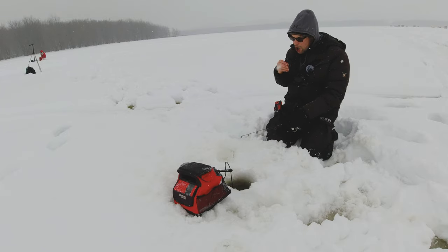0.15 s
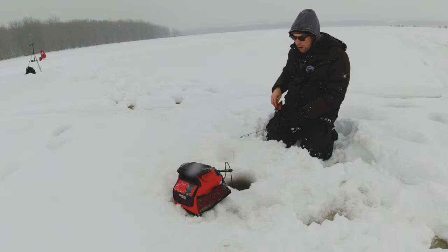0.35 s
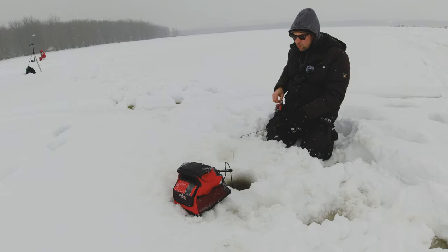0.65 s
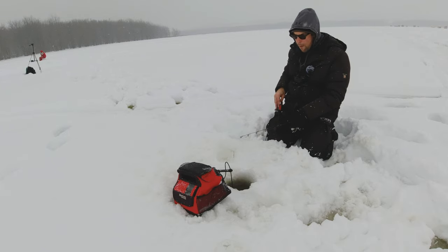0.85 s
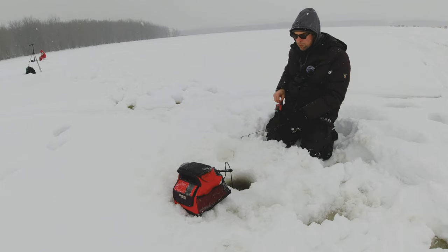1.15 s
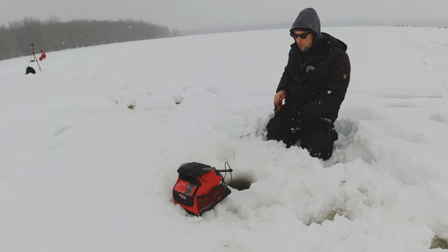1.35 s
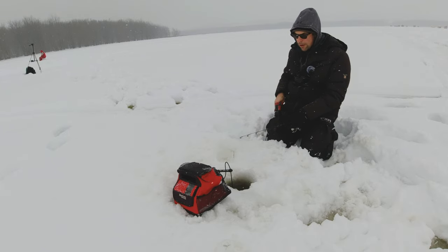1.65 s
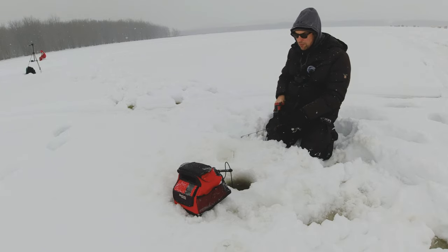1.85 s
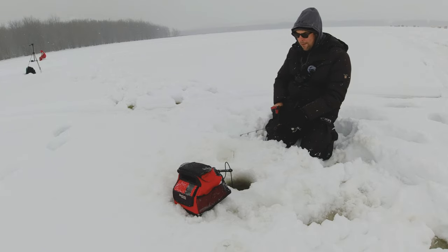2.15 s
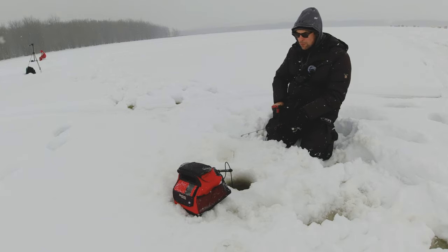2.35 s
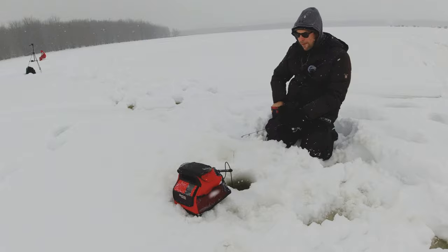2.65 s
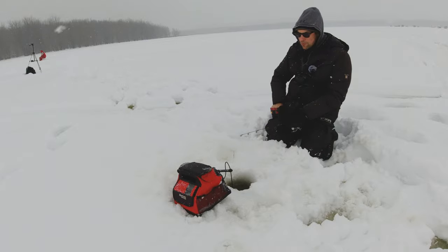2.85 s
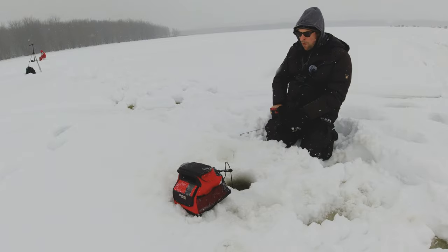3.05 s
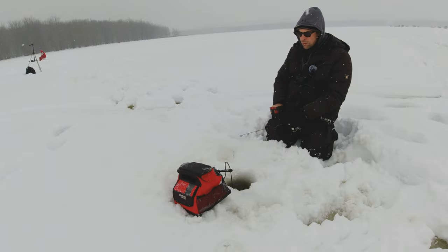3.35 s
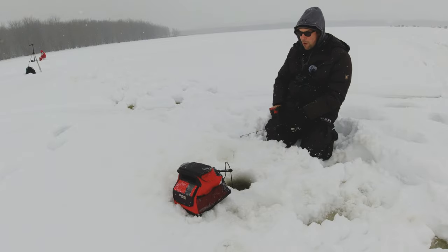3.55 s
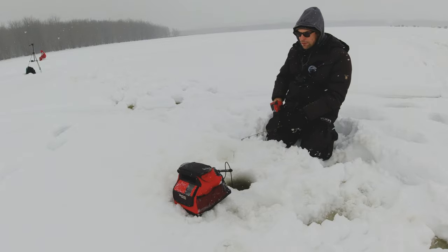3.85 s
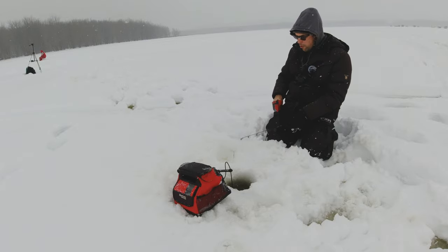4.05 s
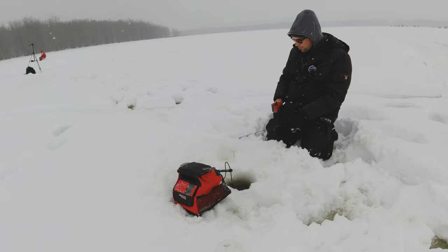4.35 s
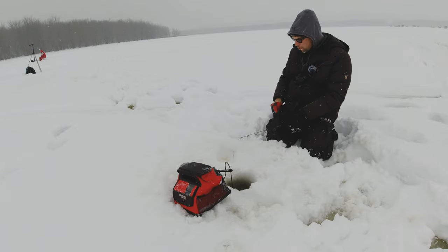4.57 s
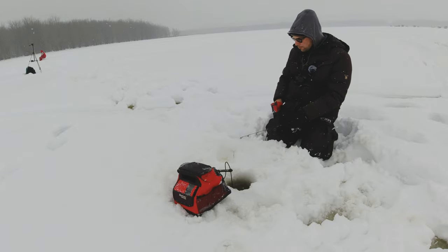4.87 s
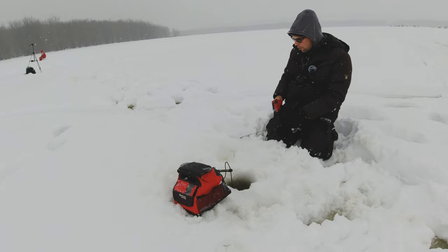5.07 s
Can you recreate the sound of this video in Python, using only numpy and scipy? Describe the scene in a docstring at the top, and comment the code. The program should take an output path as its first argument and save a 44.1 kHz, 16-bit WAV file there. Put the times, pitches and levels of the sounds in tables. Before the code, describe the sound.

A stiff, cold plastic wrapper is handled right against the microphone on an open frozen lake. After a brief quiet start with wind rumble and hiss, sharp creases snap in irregular clumps, mixed with fine crackle and dull low thumps. Activity is densest around two seconds, thins near three, then picks up again to the end. Dry, close, nearly mono, no echo.

```python
"""A stiff, cold plastic wrapper crumpled close to one microphone on a frozen lake, for about five seconds.
Wind rumble and each channel's hiss, both shaped noise, run throughout; a faint wavering sine whistles first.
From 0.37 s creases snap one by one, each a short ring, a bright tick and a soft push, over dull thumps
and fine crackle that follows the hand. The whistle returns near 1 s, a gust lifts the rumble around 1.4 s,
a third whistle comes near 3.6 s, and the creases go on to the end."""
import sys
import numpy as np
from scipy import signal
from scipy.io import wavfile
from scipy.ndimage import uniform_filter1d

SR = 44100
rng = np.random.default_rng(int(sys.argv[2]) if len(sys.argv) > 2 else 0)


def store_wav(level_fs):
    """Save 16-bit WAV to argv[1]."""
    pcm = np.round(np.clip(np.atleast_2d(level_fs), -1, 1) * 32767)
    wavfile.write(sys.argv[1], SR, pcm.T.astype(np.int16))


N = 229960  # samples

# Each crease that buckles close to the microphone:
# (time [s], loudest body level [dB], ring pitch [Hz], bright tick against the body [dB], time scale [ms])
CREASES = [(0.3735, -17.5, 3480, -11, 1.6), (0.3822, -23, 2400, -13, 12), (0.4015, -17.5, 1160, -10, 4.7),
           (0.4256, -25, 3300, -3, 1.5), (0.4297, -24, 2700, -18, 4.3), (0.529, -27, 2620, -17, 1.2),
           (0.5422, -23, 1680, -35, 1.6), (0.5684, -26, 1500, -30, 3.9), (0.577, -24, 1290, -52, 2.1),
           (0.5953, -26.5, 2650, -14.5, 5.4), (0.7778, -27, 1800, -5, 4.5), (0.7946, -29, 1260, -27, 7.6),
           (0.8147, -22, 1410, -15, 3.3), (0.8353, -32, 990, -33, 5), (0.884, -36, 2580, -27, 1.7),
           (0.9319, -26, 1490, -19.5, 8.2), (1.0671, -28, 1600, -14.5, 6.9),
           (1.2474, -21.5, 1030, -38, 2.7), (1.2814, -19, 2950, -9, 2.7), (1.3011, -19, 1620, -13, 9.3),
           (1.31, -18.5, 2110, -6, 4.7), (1.343, -26.5, 2380, -12, 7.5), (1.3548, -17.5, 1800, -15, 0.27),
           (1.3855, -18, 1520, -5, 6.5), (1.4266, -20, 1110, -22, 0.4), (1.459, -41.5, 2630, 6.5, 7.3),
           (1.5122, -23, 1810, -12, 1), (1.5296, -14, 1140, -11, 3.1), (1.5376, -16.5, 1850, -12.5, 7.3),
           (1.5505, -20.5, 1530.0, -23, 0.91), (1.6257, -33.5, 1770, -17, 3.3),
           (1.658, -18, 1750, -9.5, 7.1), (1.6765, -32, 1400, -22, 2), (1.692, -21, 1760, -21, 3.6),
           (1.746, -34, 2700, -12, 1.5), (1.772, -31, 2180, -25, 3.8), (1.7915, -27, 2070, -21.0, 2.6),
           (1.8043, -24.5, 2140, -20, 5.6), (1.815, -20.5, 2880, -12, 2.5), (1.825, -21, 2980, -10, 1.2),
           (1.846, -27, 2400, -8, 3.3), (1.8624, -20, 1540, -11, 0.95), (1.897, -21, 1730, -11, 2.4),
           (1.9083, -22.5, 2470.0, -6, 2.8), (1.921, -26.5, 1900, -18, 5.5),
           (1.9713, -26.5, 1600, -18, 3.5), (1.982, -23, 1920, -10.5, 5.6), (1.998, -22, 3150, -15, 2),
           (2.0059, -26.5, 2020, 3, 3.3), (2.033, -28, 2520, -18, 8.6), (2.083, -21, 1800, -0.5, 3),
           (2.104, -18.5, 3450, -4, 2.2), (2.118, -17, 2380, -4, 2.6), (2.1385, -21, 2420, -12, 1.6),
           (2.148, -22.5, 1960, -1, 1.4), (2.1627, -28, 1500, -16, 2), (2.191, -26.5, 1970, -7.5, 5.9),
           (2.262, -7.5, 4000, -14, .9), (2.2746, -29.5, 2050, -9, 4.1), (2.3464, -28.5, 1950, -12, 2.2),
           (2.397, -18.5, 2440, -5.5, 1.1), (2.4081, -17.5, 2180, -34, 2.1), (2.4707, -26, 1700, -18, 0.83),
           (2.544, -37.5, 2810, 0, 0.84), (2.5587, -28, 3300, -20, 1.2), (2.567, -23.5, 2340, -16, 1.5),
           (2.579, -32, 1700, -23, 1.3), (2.5853, -18.5, 2450, -15.5, 3.9), (2.5996, -18, 1400, -12, 3.5),
           (2.64, -29, 2400, -9, 3), (2.702, -23, 1660, -14, 2.1), (2.7376, -23.5, 1040, -9, 1.2),
           (2.7538, -24.5, 2200, -26, 1.3), (2.7597, -20.5, 2560, -8, 3.2), (2.7675, -22.5, 2100, -25, 4.5),
           (2.7815, -30, 3330, -19, 1), (2.856, -32.5, 1780, -29, 2), (2.9327, -33.5, 1670, -31.0, 2.4),
           (2.9468, -34, 1810, -20, 9.1), (2.991, -28.5, 2140, -12, 2.3), (3.02, -32.5, 1740.0, -13, 3.9),
           (3.0368, -30.5, 1100, -15, 1.7), (3.1564, -26.5, 3120, -5, 0.81), (3.2204, -34, 1970, -7, 0.62),
           (3.2445, -29, 1820, -35.0, 0.61), (3.3598, -30, 1330, -24, 1.5),
           (3.3844, -27.5, 3470, -16.5, 2.1), (3.4699, -16, 1270, -26, 1.9), (3.506, -25, 2650, -17, 0.88),
           (3.6823, -26, 1750, -21, 1.9), (3.747, -25, 1950.0, -8.5, 1.9), (3.7586, -20, 1540, -14, 1.3),
           (3.765, -28, 1650, -13, 5.6), (3.7781, -19, 1780, -13, 1.6), (3.807, -18.5, 1800, -13.5, 7.7),
           (3.816, -17.5, 1660, -15, 4.2), (3.8327, -31, 2200, -9, 3.7), (3.8378, -26, 1500, -5, 2),
           (3.8439, -11.5, 1720, -13, 3), (3.8707, -20.5, 1520, -10.5, 3.6), (3.9046, -21, 960, -21, 8.9),
           (3.942, -32.5, 3200, -13, 1.2), (3.9589, -16.5, 1580, -17, 0.69),
           (4.0086, -19.5, 1310, -19, 10.3), (4.0405, -20, 1490, -32, 1.3), (4.064, -19.5, 1170, -44, 1.9),
           (4.128, -32, 2230, -17, 3.1), (4.1781, -26.5, 1240, -25, 3.2), (4.256, -21, 1420, -36, 0.75),
           (4.2698, -15.5, 2650, -26, 0.27), (4.3343, -29, 3120, -16, 1.1), (4.3854, -24.5, 1070, -17, 1.4),
           (4.394, -27, 2270, -15, 2), (4.421, -16, 1590, -1.5, 2.1), (4.4268, -16.5, 1410, -11, 4.2),
           (4.4463, -21.0, 2100, -11, 5.8), (4.4543, -26, 1420, -15, 0.89), (4.4686, -24, 1950, -11, 7.2),
           (4.4941, -22.5, 1500, -23, 1.6), (4.499, -22, 1590, -10.5, 3.4),
           (4.595, -19.5, 1560, -12.5, 0.62), (4.609, -25.5, 1400, -29, 1.8),
           (4.6374, -40, 3800, -18, 0.93), (4.6922, -27.5, 1410, -24, 2.3), (4.7224, -28.5, 1260, -5, 2.9),
           (4.742, -29.5, 2100, -20, 1.5), (4.7732, -29.5, 1690, -14, 8), (4.7945, -23.5, 1390, -13, 2.2),
           (4.8032, -24, 830, -37, 0.49), (4.8211, -21.5, 1590, -17, 2.9), (4.9093, -26, 1590, -15, 5),
           (4.948, -23.5, 2930, -16, 3), (4.9813, -26.5, 1810, -27, 1.7), (4.9866, -21.5, 1810, -21, 2.2),
           (5.0013, -28.5, 1560, -5, 3.6), (5.0644, -24, 1490, -17, 0.56), (5.0795, -28, 1344, -36, 4),
           (5.1052, -20.5, 2880, -29, 3.3), (5.1371, -22.5, 1150, -29, 2.2),
           (5.1426, -19, 2450, -14.5, 2.7), (5.1852, -17.5, 1560, -10.5, 4.3),
           (5.1844, -20, 4430, -6.5, 2.5)]


def snaps():
    """The loud creases: the sheet buckles at separate moments, each with its own panel and force."""
    out = np.zeros(N)
    chance = rng.standard_normal((len(CREASES), 3, 900))
    for (time_s, *settings), draws in zip(CREASES, chance):
        add(out, time_s, snap(*settings, draws))
    return out


KNEE_HZ = 4990  # low-pass for the body of a crease; its tick goes higher


def snap(level_db, ring_hz, tick_db, length_ms, chance):
    """One crease: a run of tiny slips rings a panel and ticks; a slow fold swells before it dies."""
    t = np.arange(chance.shape[1]) / SR
    u = t * 1000 / max(length_ms, .3)  # time in units of the crease's own time scale
    swell = u ** (0.049 * length_ms) * np.exp(-2.1 * u)
    after_rustle = 0.029 * np.exp(-t / 0.0039)
    # uneven: a few slips carry most of the force
    slips = chance[0] * abs(chance[1]) ** 0.5 * (swell + after_rustle)
    # the first give is one clean crack
    slips = slips + 1.18 * np.sqrt(t * SR) * np.exp(-t / .00006)

    panel = ringing(ringing(slips, ring_hz, width=0.64), ring_hz, width=0.7)
    around = band(band(slips, 0.41 * ring_hz, 2.95 * ring_hz), 510, 2 * KNEE_HZ)
    body = evened(evened(panel) + amp(-1.5) * evened(around))
    body = signal.sosfilt(signal.butter(6, KNEE_HZ, fs=SR, output="sos"), body)

    tick = band(slips * np.exp(-.6 * u), 4320, 11300)
    # the sheet yields under the fold; small, high panels move less of it
    give = band(chance[2] * np.sqrt(t) * np.exp(-t / 0.0026), 88, 880)
    give_db = -9.0 - 5.0 * np.log2(ring_hz / 1500)
    whole = body + amp(tick_db) * evened(tick) + amp(give_db) * evened(give)
    loudest = np.sqrt(uniform_filter1d(body ** 2, size=100).max())  # rms over 100 samples
    return amp(level_db) * whole / loudest


# Colour of the fine crackle: (frequency [Hz], relative level per Hz [dB])
SHEET_COLOUR = [(180, -21), (300, -12), (762, 2.5), (1120, 2), (3700, -4.5), (5080, -9), (10900, -13),
                (15500, -45.5)]


def crackle():
    """Small creases in clumps, each with its own colour, few of them large; the whole sheet rumples dully."""
    clumps = amp(4.5 * np.clip(drift(per_s=102), -2, 1.5))
    happens = rng.random(N) < 450 / SR  # about 450 small creases per second
    size = amp(3.16 * np.minimum(rng.exponential(1, N), 3.6)) * happens
    kind = rng.integers(0, 32, N)
    creases = np.zeros(N)
    t = np.arange(400) / SR
    for k, hz in enumerate(np.geomspace(500, 9000, num=32)):
        slips = rng.standard_normal(len(t)) * np.exp(-t / 0.00076)
        ring = ringing(ringing(slips, hz, width=0.63), hz, width=1.87)
        burst = evened(ring) + 0.21 * evened(slips)
        creases += signal.oaconvolve(size * (kind == k), hz ** 0.21 * burst)[:N]
    creases = creases * clumps

    fine = evened(coloured(creases, SHEET_COLOUR))
    # layers slide over each other
    slide = evened(coloured(rng.standard_normal(N) * clumps ** 0.8, SHEET_COLOUR))
    airy = evened(band(creases, 9900, 11700))  # the same small creases, heard again in a high band
    rumple = evened(band(rng.standard_normal(N) * clumps ** 1.33, 127, 490))
    return hand() * (fine + amp(-6.0) * rumple + amp(-11) * slide + amp(-15.0) * airy)


# Each squeeze of the hand: (start time [s], hold [s], level of the fine crackle [dB])
HAND_SQUEEZES = [(0.397, 0.0078, -29), (0.537, 0.03, -38), (0.793, 0.0054, -33), (0.888, 0.081, -44),
                 (1.041, 0.055, -48.5), (1.279, 0.014, -26), (1.389, 0.0059, -36.5), (1.455, 0.012, -42),
                 (1.51, 0.0088, -31), (1.657, 0.051, -35), (1.768, 0.072, -34.5), (1.904, 0.15, -33.5),
                 (2.113, 0.044, -31.5), (2.257, 0.11, -47.5), (2.383, 0.073, -34.5), (2.576, 0.052, -36.5),
                 (2.673, 0.11, -39), (2.954, 0.31, -51.5), (3.352, 0.02, -43), (3.644, 0.14, -42.5),
                 (3.772, 0.056, -29), (3.873, 0.057, -35.5), (4.035, 0.064, -38.5), (4.195, 0.15, -37.5),
                 (4.388, 0.079, -38), (4.625, 0.014, -39.5), (4.674, 0.052, -35.5), (4.835, 0.045, -46),
                 (5.063, 0.13, -38), (5.11, 0.05, -38), (5.195, .03, -37)]
# Faint crackle of the sheet between squeezes: (time [s], level [dB])
RESTING_SHEET = [(.75, -62), (1.1, -55), (3.2, -51.5), (3.5, -51.5), (4.52, -49), (4.7, -46)]
GRIP_DB_PER_S, EASE_DB_PER_S = 423, 364  # how fast a squeeze comes on and lets go


def hand():
    """Level of the fine crackle: every squeeze grips, holds and eases over the resting sheet."""
    t = np.arange(0, N + 64, 64) / SR
    power = amp(np.interp(t, *np.transpose(RESTING_SHEET))) ** 2
    for start_s, hold_s, db in HAND_SQUEEZES:
        early = np.maximum(start_s - t, 0)
        late = np.maximum(t - start_s - hold_s, 0)
        power = power + amp(db - GRIP_DB_PER_S * early - EASE_DB_PER_S * late) ** 2
    return np.interp(np.arange(N) / SR, t, np.sqrt(power))


# Dull shoves of the whole sheet:
# (listed time [s], the push starts 2.94 ms later; peak level [dB], centre frequency [Hz])
SHOVES = [(0.367, -21.5, 209), (0.522, -40, 151), (0.591, -25, 330), (0.774, -28, 130), (1.064, -20.5, 253),
          (1.243, -26, 256), (1.29, -17.5, 203), (1.654, -23, 305), (1.977, -24, 306), (2.142, -20, 372),
          (2.596, -15.5, 620), (2.713, -17.5, 386), (3.677, -28, 243), (3.747, -26, 262), (3.807, -18, 238),
          (3.874, -17.5, 293), (4.172, -27.5, 270), (4.591, -19, 385), (4.717, -18.5, 254),
          (4.782, -29, 266), (4.943, -17, 500), (5.099, -21, 195)]
SHOVE_OFFSET_S = 0.00294  # constant added to every listed time


def thumps():
    """The sheet shoved as a whole: one or two soft cycles of low push, a little rough."""
    out = np.zeros(N)
    t = np.arange(2200) / SR
    chance = rng.standard_normal((len(SHOVES), len(t)))
    for (time_s, db, hz), draws in zip(SHOVES, chance):
        push = np.sin(2 * np.pi * hz * t) * (hz * t) * np.exp(-hz * t / 0.49)
        rough = band(draws * t * np.exp(-hz * t / 0.52), 0.28 * hz, 2.22 * hz)
        shove = evened(push) + 0.81 * evened(rough)
        add(out, time_s + SHOVE_OFFSET_S, amp(db) * shove / abs(shove).max())
    return out


# Faint whistles, pitch and level before they waver:
# (start time [s], length [s], first pitch [Hz], last pitch [Hz], level [dB])
FAINT_WHISTLES = [(.24, .07, 1090, 990, -58), (.965, .075, 982, 972, -51), (3.59, .1, 1000, 880, -58)]


def whistles():
    """A thin tone: a gliding sine that wavers in pitch and strength."""
    out = np.zeros(N)
    waver, flutter = drift(per_s=33), drift(per_s=83)
    for start_s, length_s, first_hz, last_hz, db in FAINT_WHISTLES:
        at = round(start_s * SR) + np.arange(round(length_s * SR))
        pitch_hz = np.linspace(first_hz, last_hz, len(at)) * (1 + 0.0074 * waver[at])
        tone = np.sqrt(2) * np.sin(2 * np.pi * np.cumsum(pitch_hz) / SR)
        fade = signal.windows.tukey(len(at), .4)
        add(out, start_s, amp(db + 1.9 * flutter[at]) * tone * fade)
    return out


# Colour of the wind and open air over the lake: (frequency [Hz], relative level per Hz [dB])
AIR_COLOUR = [(8.8, -74), (15, 22), (32, -4.5), (54, -3.5), (134, -18), (213, -20), (575, -18), (793, -17),
              (1420, -24.5), (16000, -52)]
AIR_DB = -46.5  # level around which the wash drifts
GUST_S, GUST_WIDTH_S, GUST_DB = 1.4, 0.27, 8  # one stronger gust: centre, width, lift of the rumble


def air():
    """Low wind as slowly drifting coloured noise; one gust lifts the rumble."""
    wash = amp(AIR_DB + 0.5 * drift(per_s=1.1)) * evened(coloured(rng.standard_normal(N), AIR_COLOUR))
    gust = np.exp(-((np.arange(N) / SR - GUST_S) / GUST_WIDTH_S) ** 2)
    return wash + (amp(GUST_DB * gust) - 1) * band(wash, 29, 95)


def amp(db):
    """Decibels to an amplitude factor."""
    return 10 ** (np.asarray(db) / 20)


def evened(x):
    """Scales x to rms 1."""
    return x / np.sqrt(np.mean(x ** 2) + 1e-20)


def add(mix, time_s, sound):
    """Lays a sound into the mix at its time, cut at the end."""
    part = mix[round(time_s * SR):][:len(sound)]
    part += sound[:len(part)]


def ringing(x, hz, width):
    """A two-pole resonance; width is a share of its pitch."""
    r = np.exp(-np.pi * width * hz / SR)
    return signal.lfilter([1, 0, -1], [1, -2 * r * np.cos(2 * np.pi * hz / SR), r * r], x)


def band(x, lo_hz, hi_hz):
    """Keeps what lies between two frequencies."""
    sos = signal.butter(2, [lo_hz, min(hi_hz, .45 * SR)], "band", fs=SR, output="sos")
    return signal.sosfilt(sos, x)


def coloured(x, points):
    """Filters x by a (Hz, dB) spectrum, causally, so that clicks keep their sharp fronts."""
    f, db = np.transpose(points)
    hz = abs(np.fft.fftfreq(8192, 1 / SR))
    log_gain = np.log(amp(np.interp(np.log(hz + 1), np.log(f + 1), db)))
    # minimum phase: the phase follows from the log gain
    taps = np.fft.ifft(np.exp(np.conj(signal.hilbert(log_gain)))).real[:4096]
    return signal.oaconvolve(x, taps)[:len(x)]


def drift(per_s):
    """Slow chance: noise smoothed twice, rms 1."""
    size = max(int(SR / per_s), 1)
    return evened(uniform_filter1d(uniform_filter1d(rng.standard_normal(N), size), size))


def scene():
    """Wrapper, whistles and wind at one microphone, the same on both channels."""
    return np.tile(snaps() + thumps() + crackle() + whistles() + air(), (2, 1))


# Colour of the recorder's hiss: (frequency [Hz], relative level per Hz [dB])
HISS_COLOUR = [(18, -32), (30, 6), (449, -11), (584, -5), (801, -13), (3060, -11.5), (16000, -11)]
HISS_DB, EDGE_HZ = -58, 16100  # hiss level before the band limit, and that limit


def record(dry):
    """The recorder: each channel adds its own steady hiss; then a low-pass limits the band."""
    hiss = [evened(coloured(rng.standard_normal(N), HISS_COLOUR)) for _ in dry]
    wet = dry + amp(HISS_DB) * np.array(hiss)
    low_pass = signal.firwin(511, EDGE_HZ, window=("kaiser", 9), fs=SR)
    return signal.oaconvolve(wet, low_pass[None], "same")


dry = scene()
out = record(dry)
store_wav(out)
```